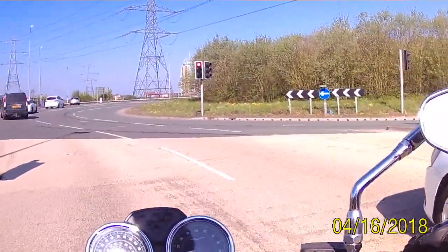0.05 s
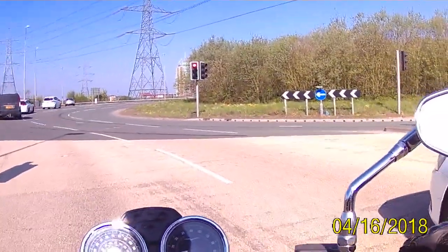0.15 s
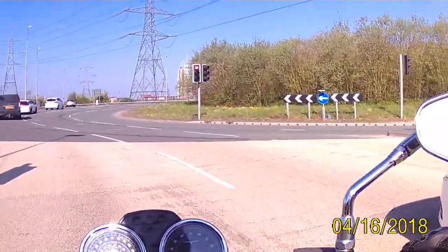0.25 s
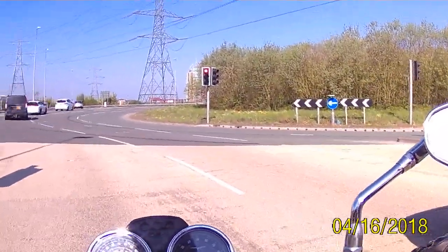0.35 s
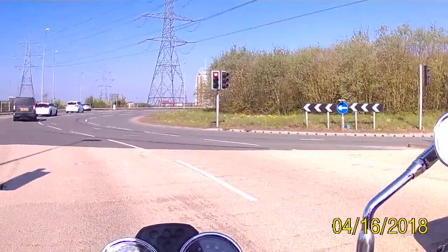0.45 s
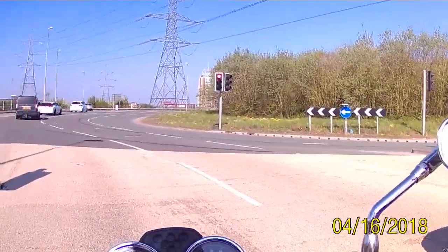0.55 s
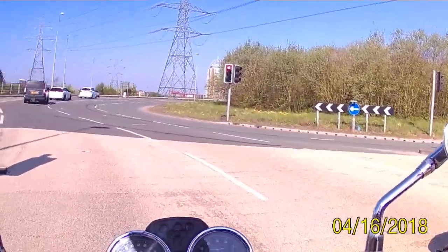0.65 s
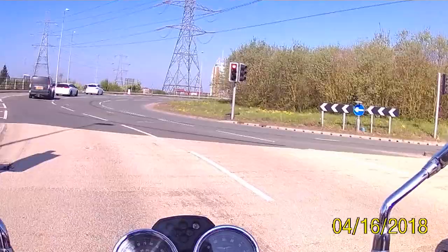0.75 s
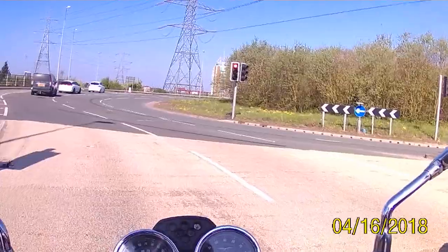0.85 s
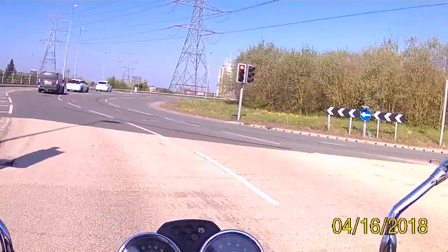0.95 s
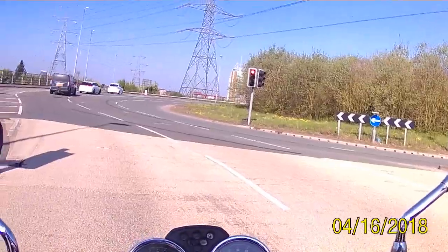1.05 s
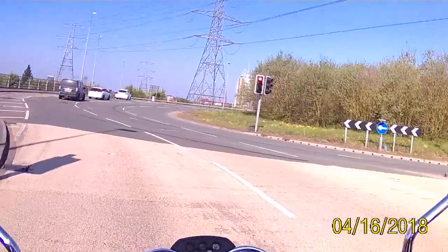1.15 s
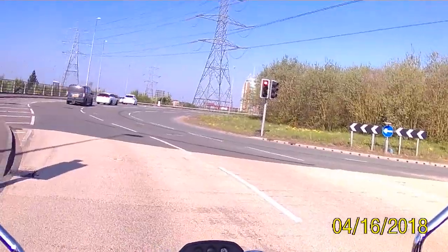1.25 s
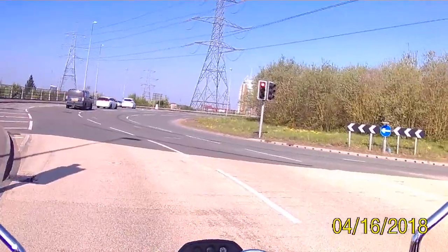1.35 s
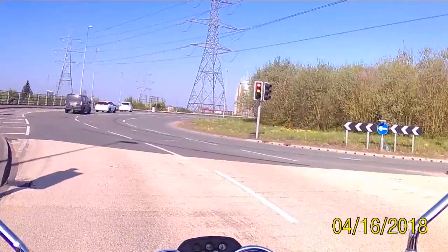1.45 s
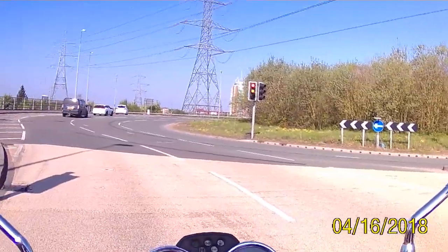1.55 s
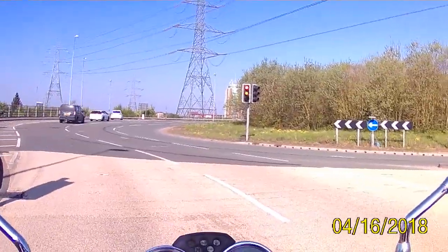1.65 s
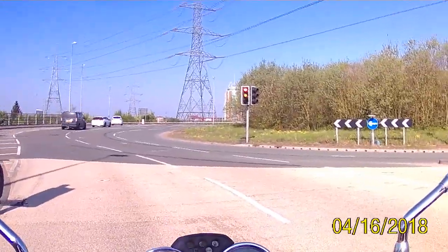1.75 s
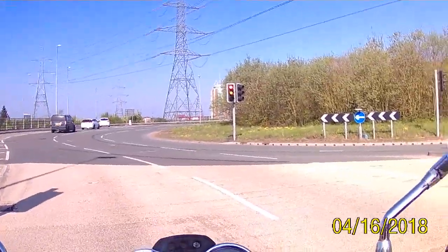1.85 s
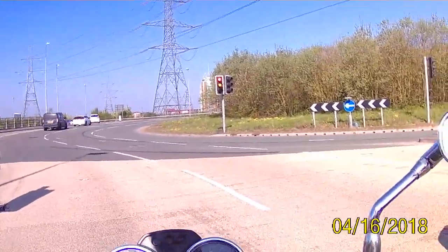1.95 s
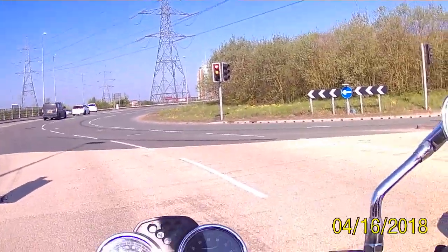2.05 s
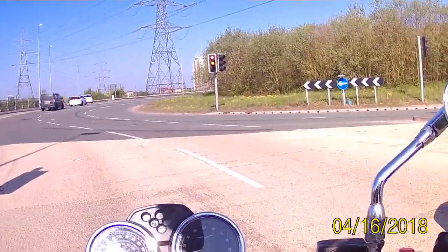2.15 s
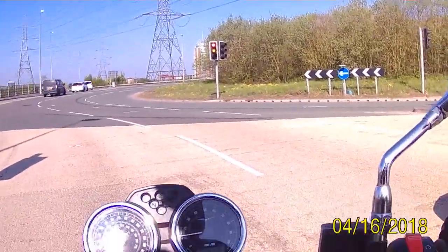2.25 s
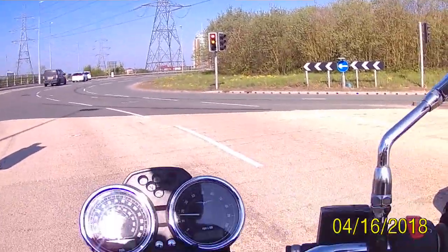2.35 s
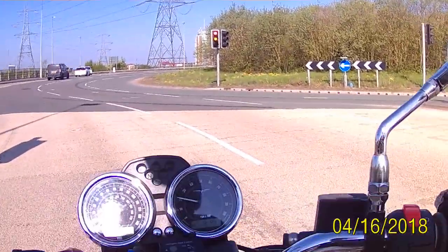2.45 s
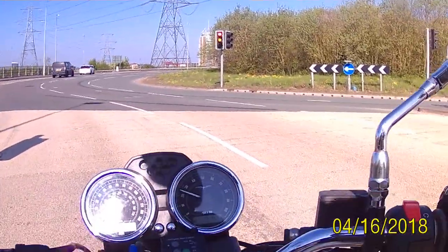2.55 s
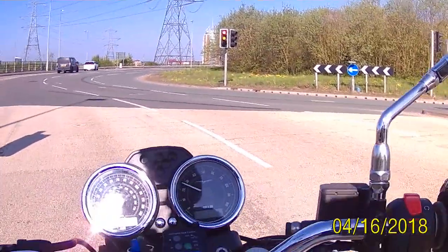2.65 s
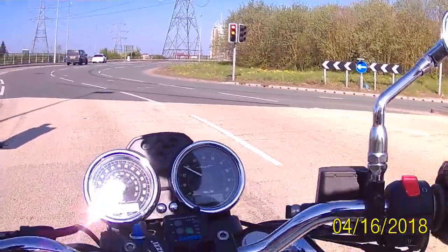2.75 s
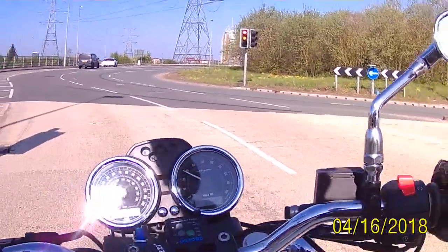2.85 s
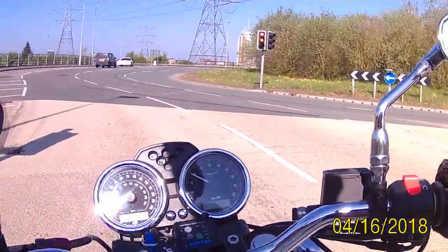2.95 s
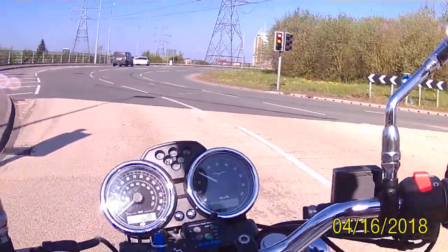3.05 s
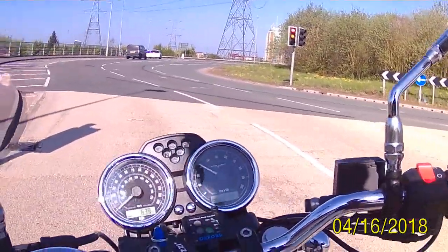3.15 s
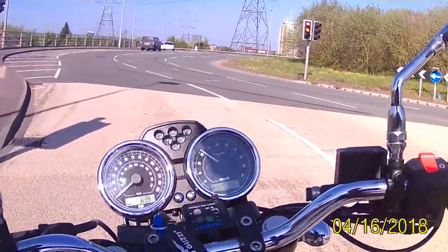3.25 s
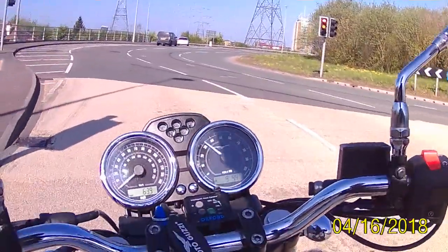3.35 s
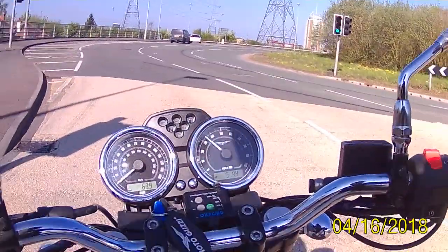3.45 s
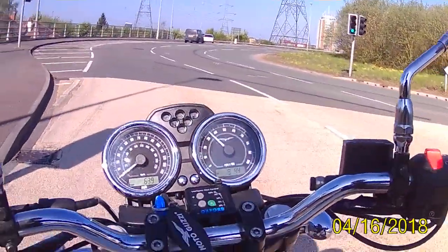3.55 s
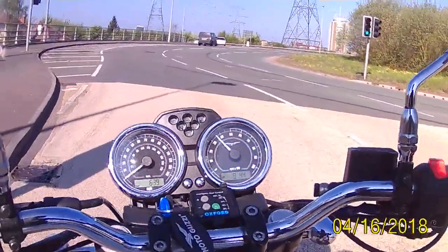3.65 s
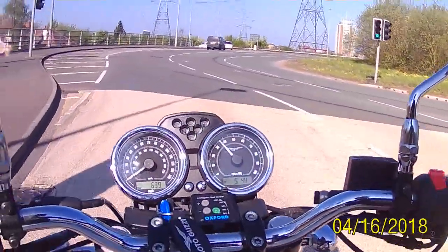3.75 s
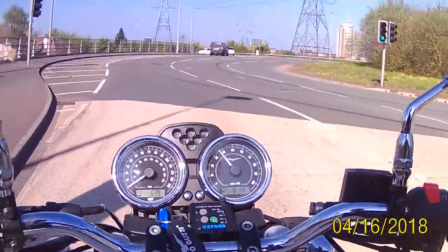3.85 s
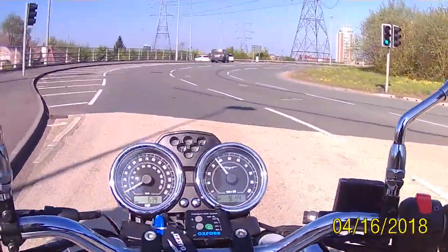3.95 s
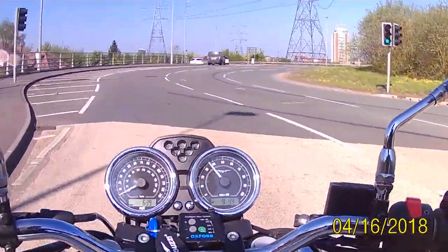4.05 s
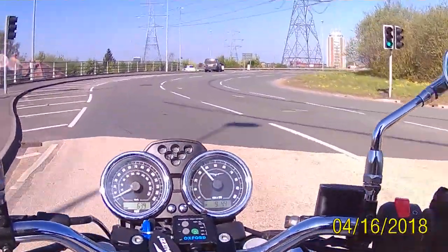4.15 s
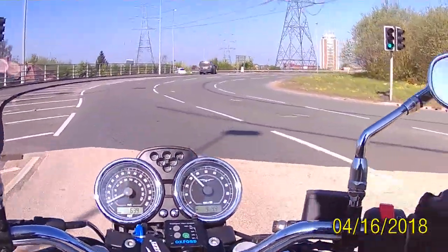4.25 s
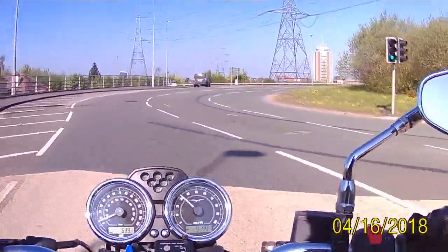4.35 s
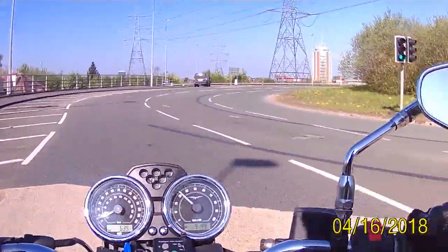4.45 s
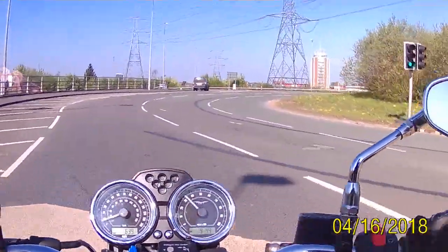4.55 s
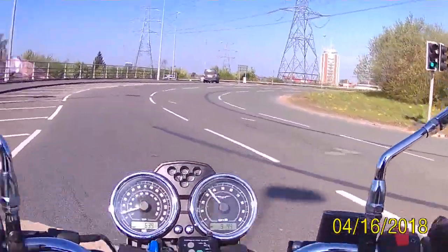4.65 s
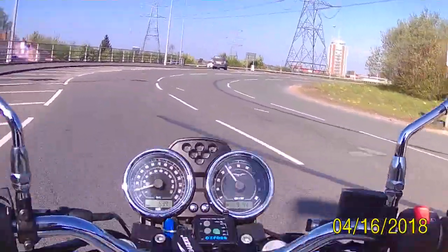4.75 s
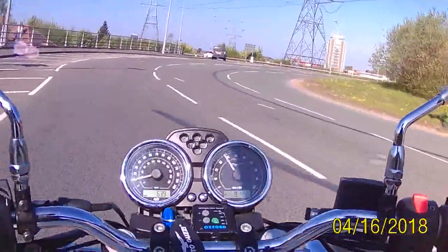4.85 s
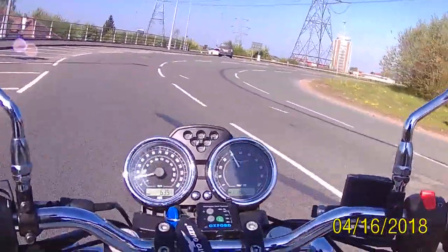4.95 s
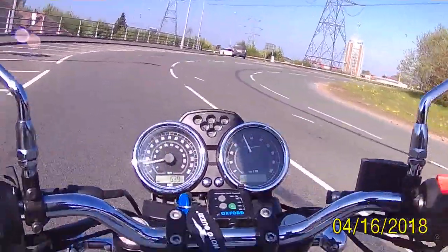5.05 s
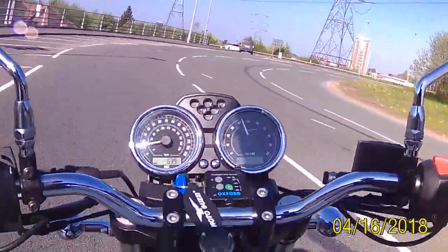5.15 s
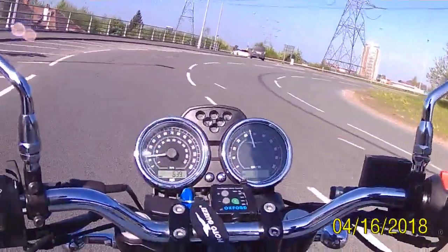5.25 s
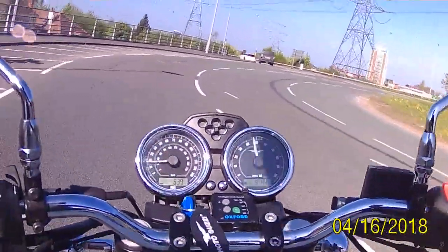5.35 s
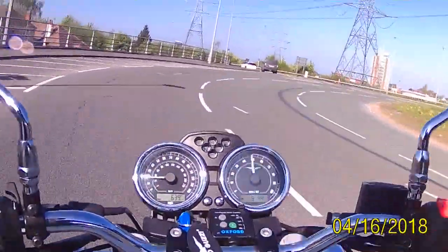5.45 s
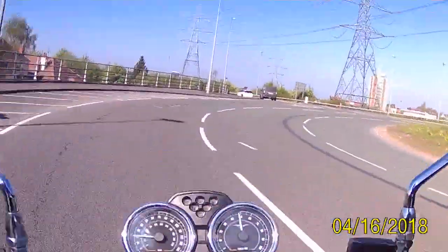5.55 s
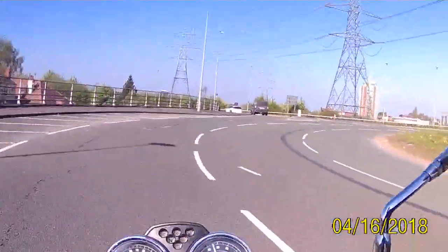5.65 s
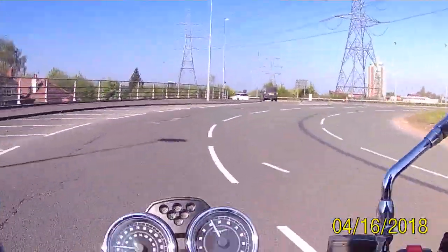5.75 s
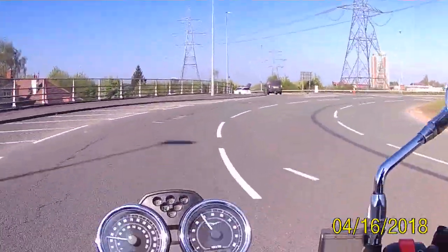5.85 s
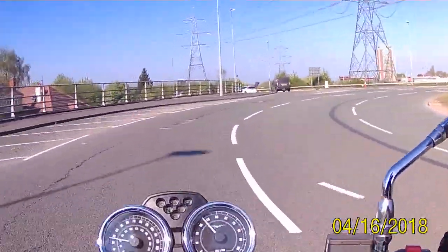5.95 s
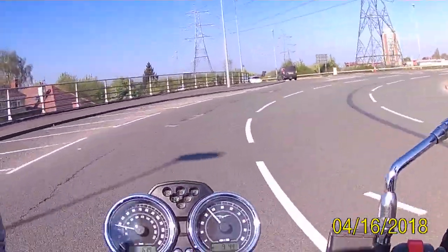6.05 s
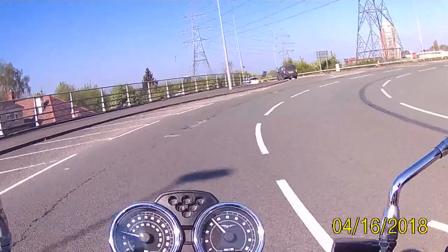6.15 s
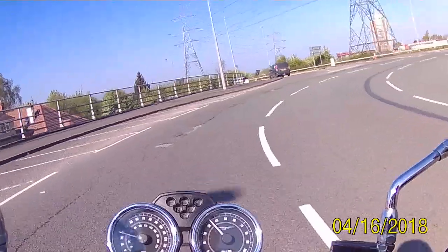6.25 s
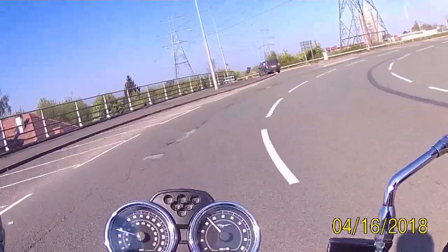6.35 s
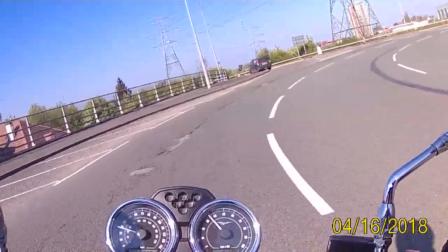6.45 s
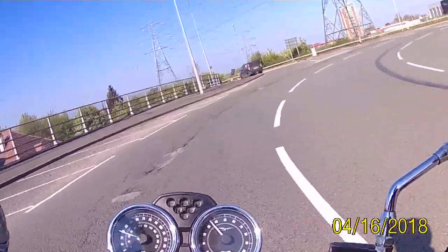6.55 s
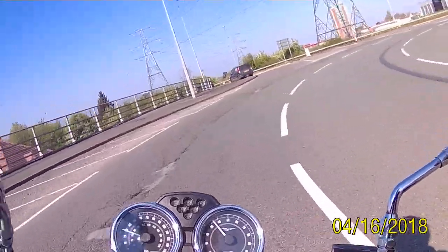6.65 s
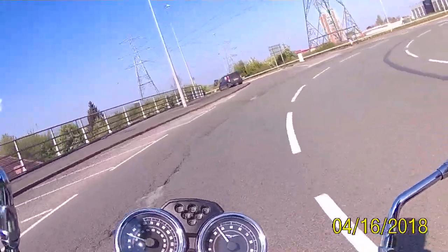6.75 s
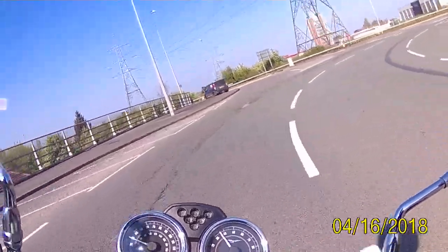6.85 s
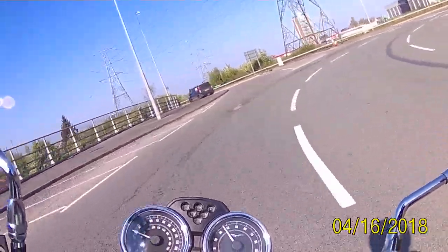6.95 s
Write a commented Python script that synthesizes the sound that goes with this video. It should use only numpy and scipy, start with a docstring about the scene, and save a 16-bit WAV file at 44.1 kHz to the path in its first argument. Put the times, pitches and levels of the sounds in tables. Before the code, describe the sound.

A V-twin motorcycle idles unevenly, clicks into gear, pulls away revving hard and changes up, with wind and traffic behind.

```python
"""A V-twin motorcycle, heard by a boxed microphone on the rider, over traffic, wind and hiss.
It idles first: two uneven exhaust blows a cycle thump in the pipes and crack through the box's
resonance near 1.2 kHz, while the valves clatter. At 2.4 s it clicks into gear and pulls away, revving
hard as the wind grows. At 5.8 s the throttle shuts and the intake gulps take over.
It changes up with a double click at 6 s, and the new gear whines."""
import sys
import numpy as np
from scipy import signal
from scipy.fft import rfft, irfft
from scipy.io import wavfile

SR = 44100
rng = np.random.default_rng(int(sys.argv[2]) if len(sys.argv) > 2 else 0)


def pcm_store(signal):
    """Save signal as 16-bit PCM."""
    levels = np.round(np.clip(np.atleast_2d(signal), -1, 1) * 32767)
    wavfile.write(sys.argv[1], SR, levels.astype(np.int16).T)


N = 309582
TIME_S = np.arange(N) / SR


def amp(db):
    """Gain of a dB value."""
    return 10 ** (np.asarray(db) / 20)


def rms_one(x):
    """Scale to rms 1."""
    return x / np.sqrt(np.mean(x ** 2) + 1e-20)


def in_time(rows):
    """Columns of a curve table, one value per sample."""
    times_s, *columns = np.transpose(rows)
    return [np.interp(TIME_S, times_s, column) for column in columns]


def butter(x, hz, kind, order=2):
    """Causal Butterworth filter."""
    return signal.sosfilt(signal.butter(order, hz, kind, fs=SR, output="sos"), x)


def colour(x, spectrum):
    """Minimum-phase filter with the given spectrum, noise gain 1."""
    hz, db = np.transpose(spectrum)
    bins_hz = np.arange(4097) * SR / 8192
    log_gain = np.interp(np.log(bins_hz + 1), np.log(hz), db) * np.log(10) / 20
    cepstrum = irfft(log_gain)
    cepstrum[1:4096] *= 2   # fold onto positive time
    cepstrum[4097:] = 0
    response = irfft(np.exp(rfft(cepstrum)))
    return signal.fftconvolve(x, response / np.sqrt(np.sum(response ** 2)))[:N]


def drift(hz):
    """Random wander below hz, rms 1."""
    return rms_one(butter(rng.standard_normal(N + SR), hz, "low")[SR:])


# Each row: centre in Hz, width in Hz, level in dB.
HISS_BANDS = [(6500, 380, -77), (7590, 550, -67.5), (8530, 1300, -74.5), (10910, 1300, -61),
              (13200, 1200, -75), (15600, 700, -71.5)]

def hiss():
    """Steady microphone hiss in bands, with one thin tone."""
    out = amp(-76) * np.sin(2 * np.pi * 13750 * TIME_S)
    for hz, width_hz, db in HISS_BANDS:
        edges_hz = [hz - width_hz / 2, hz + width_hz / 2]
        band = butter(rng.standard_normal(N), edges_hz, "band", order=1)
        out += amp(db) * rms_one(butter(band, edges_hz, "band", order=1))
    return out


# Each row: frequency in Hz, relative gain in dB.
TRAFFIC_SPECTRUM = [(88, -44.5), (150, 1.5), (237, -12.5), (291, -12.5), (380, -19), (671, -29),
                    (1220, -12), (1390, -22.5), (1990, -25), (2690, -48.5), (4110, -34), (4820, -40),
                    (6500, -42), (8450, -64), (14300, -120)]

def traffic():
    """Low street noise that slowly swells and fades."""
    return amp(-44.5 + 1.8 * drift(1.9)) * colour(rng.standard_normal(N), TRAFFIC_SPECTRUM)


# Rumble, growing with road speed. Each row: time in seconds, relative level in dB.
WIND_CURVE = [(0, -53), (3.2, -48), (3.9, -39), (5.2, -38), (5.7, -25), (6.1, -38), (7.02, -39)]
# Each row: start in seconds, envelope peak in dB.
WIND_BUFFETS = [(1.853, -26), (2.45, -36), (2.793, -36), (3.199, -33), (4.196, -36), (5.187, -30),
                (5.449, -31), (5.663, -38), (6.27, -30), (6.406, -36), (6.499, -25), (6.82, -24)]

def wind():
    """Air on the microphone port: a lumpy rumble with single soft buffets."""
    level_db = in_time(WIND_CURVE)[0] - 3.5 + 5.6 * drift(2.5)
    out = amp(level_db) * rms_one(butter(rng.standard_normal(N), [14, 52], "band"))
    rise_s = .016
    for start_s, db in WIND_BUFFETS:
        age_s = np.maximum(TIME_S - start_s, 0)
        envelope = age_s / rise_s * np.exp(1 - age_s / rise_s)
        out += amp(db) * envelope * np.sin(2 * np.pi * 33 * age_s)
    return out


# Each row: time in seconds, pitch in Hz, relative level in dB.
WHINE_CURVE = [(6.2, 1730, -60), (6.35, 1775, -43), (6.8, 1830, -37.5), (7.02, 1813, -44)]

def gear_whine():
    """The new gear sings, wavering a little."""
    hz, db = in_time(WHINE_CURVE)
    engaged = TIME_S > WHINE_CURVE[0][0]
    gain = engaged * amp(db + .5 + 1.1 * drift(21))
    return gain * np.sin(2 * np.pi * np.cumsum(hz + 9 * drift(26)) / SR)


# Clicks and valve taps in the box. Each row: frequency in Hz, relative gain in dB.
METAL_SPECTRUM = [(290, -29), (500, 6), (603, 4.5), (677, -3.5), (1110, -5.5), (1430, -4), (1830, -10),
                  (2310, -20), (3670, -26.5), (4120, -18), (4690, -28.5), (6530, -31), (8230, -43.5),
                  (10800, -40), (15800, -57)]
# Each row: start in seconds, relative level in dB.
GEAR_CLICKS = [(0.167, -31), (0.275, -36), (0.453, -32), (0.592, -49), (1.765, -42), (2.347, -31),
               (2.375, -21), (6.037, -14), (6.049, -13.5)]

def gear_clicks():
    """Lever and gears click: short noise bursts in the box."""
    out = np.zeros(N)
    envelope = np.exp(-TIME_S[:600] / .0064)
    for start_s, db in GEAR_CLICKS:
        i = round(start_s * SR)
        out[i:i + 600] += amp(db) * envelope * rng.standard_normal(600)
    return colour(butter(out, 900, "high", order=4), METAL_SPECTRUM)


# Narrow resonances of the microphone box. Each row: frequency in Hz, width in Hz, gain in dB.
BOX_MODES = [(3070, 49, 2), (1553, 57, 16.5)]

def valve_clatter(level_db, cycle_hz):
    """Dense uneven taps, made of noise, throb with the cycle and ring in the box."""
    phase = 2 * np.pi * np.cumsum(cycle_hz) / SR
    throb_db = 2.46 * np.cos(phase - .9) + np.cos(3 * phase) + 2.23 * drift(132)
    taps = amp(level_db + throb_db) * butter(rng.standard_normal(N), 1000, "high", order=4)
    rings = sum(amp(db) * signal.lfilter(*signal.iirpeak(hz, hz / width_hz, fs=SR), taps)
                for hz, width_hz, db in BOX_MODES)
    return amp(6.5) * colour(taps, METAL_SPECTRUM) + rings


# Each row: frequency in Hz, relative level in dB, decay in seconds.
SIDE_PIPE_MODES = [(85.4, 4, 0.0043), (221.4, -3, 0.0076), (266, -2.5, 0.0057), (432, -6, 0.0066),
                   (583, -14, 0.0069), (685, -10, 0.0077)]

def pipe_thump(onsets, heights, main_hz, decay_s, side_db, rise_s):
    """Each blow pulls the pressure down, then the pipe modes ring out."""
    span = 4000
    out, age_s = np.zeros(N + span), TIME_S[:span]
    side = sum(amp(db) * np.exp(-age_s / ring_s) * np.sin(2 * np.pi * hz * age_s)
               for hz, db, ring_s in SIDE_PIPE_MODES)
    for i, height in zip(onsets.ravel(), heights.ravel()):
        main = np.exp(-age_s / decay_s[i]) * np.sin(2 * np.pi * main_hz[i] * age_s)
        attack = 1 - np.exp(-age_s / rise_s[i])
        out[i:i + span] -= height * attack * (main + amp(side_db[i]) * side)
    return butter(out[:N], 73, "high", order=4)   # short pipes radiate no deep bass


# Microphone box. Each row: frequency in Hz, relative gain in dB.
BOX_SPECTRUM = [(240, -48), (400, -1), (466, -0.5), (597, -31), (644, -5), (787, -8), (1050, -1),
                (1210, -3), (1430, -9), (2070, -9.5), (2530, -36), (4200, -28.5), (4680, -29), (11800, -48),
                (15800, -89)]
# Exhaust pair, then intake pair. Each row: ring in Hz, ring level in dB, decay in seconds,
# echo delay in seconds, echo level in dB.
TAIL_PIPES = [(1225, -16, .003, .0049, -9), (1085, -13, .0016, .0064, -9), (1200, -20, .004, .005, -6),
              (1150, -20, .003, .006, -6)]

def crack(onsets, heights, noise_share, gas_decay_s=.012, spit_decay_s=.0022):
    """A sharp front rings and echoes in its tail pipe, with a bright spit and fading turbulent gas."""
    span = 2000
    out, spit = np.zeros((2, N + span))
    age_s = TIME_S[:span]
    noise = butter(rng.standard_normal(N + span), 850, "high", order=4)
    gust = np.exp(-age_s / gas_decay_s) * np.sqrt(2 / (gas_decay_s * SR))
    detunes = 1 + .025 * rng.standard_normal(onsets.shape)   # hotter or cooler gas shifts the ring
    flares = amp(3.5 * rng.standard_normal(onsets.shape))   # some blows spit harder
    for pipe, (hz, ring_db, decay_s, echo_s, echo_db) in enumerate(TAIL_PIPES):
        for i, height, detune, flare in zip(onsets[pipe], heights[pipe], detunes[pipe], flares[pipe]):
            blow = slice(i, i + span)
            ring = amp(ring_db) * np.exp(-age_s / decay_s) * np.cos(2 * np.pi * hz * detune * age_s)
            front = (age_s == 0) + ring
            front += amp(echo_db) * np.roll(front, round(echo_s * SR / detune))
            gas = 2.6 * np.sqrt(noise_share[i]) * gust * noise[blow]
            out[blow] += height * (gas - np.sqrt(1 - noise_share[i]) * front)
            spit[blow] += height ** 1.4 * flare * np.exp(-age_s / spit_decay_s) * noise[blow]
    return colour(out[:N], BOX_SPECTRUM) + amp(-42) * butter(spit[:N], [1500, 8000], "band")


def blow_onsets(cycle_hz, offsets_cycles, scatter_cycles):
    """Samples at which each cylinder blows, one row per cylinder."""
    turned = np.cumsum(cycle_hz) / SR
    due = np.arange(-1, int(turned[-1]))[:, None] + offsets_cycles
    due += np.interp(due, turned, scatter_cycles) * rng.standard_normal(due.shape)
    due_hz = np.interp(due, turned, cycle_hz, left=0)
    lead_cycles = np.interp(due_hz, (9.5, 13), (.075, 0))   # the slow idle blow starts earlier
    return np.interp(due - lead_cycles, turned, np.arange(N), left=N - 1).astype(int).T


# Each row: time in seconds, four-stroke cycles per second.
ENGINE_SPEED = [(0.0, 10.28), (0.21, 8.39), (0.5, 8.91), (0.9, 8.36), (1.97, 9.08), (2.41, 8.2),
                (2.53, 14.67), (2.67, 19.66), (3.09, 23.87), (3.21, 22.45), (3.57, 27.59), (4.05, 30.17),
                (4.31, 29.46), (4.64, 25.61), (5.11, 31.87), (5.76, 41.61), (6.15, 27.93), (7.02, 28.75)]
# Each row: time in seconds, throttle as the crack's relative level in dB.
THROTTLE_CURVE = [(0, -53), (1.2, -54), (2.35, -54), (2.6, -32), (3.3, -28), (4.1, -20.5), (4.45, -21.5),
                  (4.64, -28.5), (4.76, -22), (5, -17), (5.12, -18.5), (5.2, -15), (5.74, -13.5),
                  (5.78, -23), (5.9, -21), (6.155, -26.5), (6.17, -35.5), (7.02, -31.5)]
# Stages: idle, revs flare, clutch bites, pulling away, eased off, opening up, full throttle,
# throttle shut, revs fall, next gear. Each row: start and end of the hold in seconds; glides between.
STAGE_HOLDS = [(0, 2.4), (2.6, 2.7), (3.15, 3.3), (3.7, 4.4), (4.62, 4.68), (4.95, 5.12), (5.27, 5.76),
               (5.85, 5.9), (6.05, 6.15), (6.18, 7.02)]
# The burn in each stage. Each row: intake share 0-1, main pipe in Hz, its decay in seconds, then in dB:
# side pipe gain, first cylinder over second in thump and in crack, relative thump and clatter levels.
STAGE_BURNS = [(0.06, 89.5, 0.011, -14, 0.5, 5.5, -9, -38), (.16, 105, 0.015, -1.5, 1, 2.5, -13.5, -32),
               (0.28, 129, 0.018, -4, 2, 0, -9.5, -26), (0.06, 145, 0.017, 0, -4, -4.5, -15.5, -24),
               (0.09, 128, 0.014, -3.5, -3.5, 8, -12, -23.5), (0.04, 160, 0.012, 0.6, 1, 0, -15, -26),
               (0, 145, 0.0066, 0.9, -6, 4.5, -16, -20.5), (0.99, 119, .016, 5.5, 0, 8, -18.5, -26.5),
               (0.86, 125, 0.012, -19, 1.1, -10, -8, -30.5), (0.31, 152.3, 0.012, -9.5, -1, -2, -7.5, -31)]
EXHAUST_CYCLES, INTAKE_CYCLES = (.885, 1.23), (1.13, 1.505)   # each cylinder's place in the cycle
THUMP_FOLLOWS, CLATTER_FOLLOWS = .36, .32   # share of the throttle's swing in dB
FALTER_S, FALTER_WIDTH_S, FALTER_DB = 5.82, .016, -16.5   # blows falter briefly as the clutch goes in
FIRM_DB = -27   # a lighter throttle burns soft: slower, noisier, less even blows

def engine():
    """Exhaust and intake blows of both cylinders thump and crack over the valve clatter."""
    cycle_hz, throttle_db = in_time(ENGINE_SPEED)[0], in_time(THROTTLE_CURVE)[0]
    burns = [(s, *burn) for hold, burn in zip(STAGE_HOLDS, STAGE_BURNS) for s in hold]
    intake, main_hz, decay_s, side_db, thump_skew_db, crack_skew_db, thump_db, clatter_db = in_time(burns)
    falter_db = FALTER_DB * np.exp(-((TIME_S - FALTER_S) / FALTER_WIDTH_S) ** 2)
    softness = amp(.75 * np.maximum(FIRM_DB - throttle_db, 0))
    noise_share = np.minimum(.15 * softness, .95)
    scatter_cycles = .001 * np.sqrt(softness)

    onsets = np.r_[blow_onsets(cycle_hz, EXHAUST_CYCLES, scatter_cycles),
                   blow_onsets(cycle_hz, INTAKE_CYCLES, scatter_cycles)]
    power = np.r_[1 - intake[onsets[:2]], intake[onsets[2:]]]
    strength = np.sqrt(power / cycle_hz[onsets])   # more blows a second share the power
    skew = np.array([[.5], [-.5], [0], [0]])   # exhaust pair only
    uneven_db = 3 * np.sqrt(noise_share[onsets]) * rng.standard_normal((2,) + onsets.shape)

    thump_drive_db = thump_db + THUMP_FOLLOWS * throttle_db + falter_db + 21.5
    crack_drive_db = throttle_db + falter_db + 32.5
    thumps = strength * amp(thump_drive_db[onsets] + skew * thump_skew_db[onsets] + .6 * uneven_db[0])
    cracks = strength * amp(crack_drive_db[onsets] + skew * crack_skew_db[onsets] + uneven_db[1])
    return (pipe_thump(onsets, thumps, main_hz, decay_s, side_db, rise_s=.0013 * softness)
            + crack(onsets, cracks, noise_share)
            + valve_clatter(clatter_db + CLATTER_FOLLOWS * throttle_db, cycle_hz))


def scene():
    """Everything at the one microphone."""
    return (traffic() + engine() + gear_clicks() + wind() + gear_whine() + hiss())[None]


def record(dry):
    """The input drops the deepest bass, the loudest blows overload it, the top is cut."""
    ceiling, cutoff_hz = .59, 15750
    dry = butter(dry, 22, "high")
    clipped = dry / (1 + np.abs(dry / ceiling) ** 8) ** (1 / 8)
    return signal.sosfilt(signal.ellip(12, .5, 80, cutoff_hz, fs=SR, output="sos"), clipped)


dry = scene()
out = record(dry)
pcm_store(out)
```